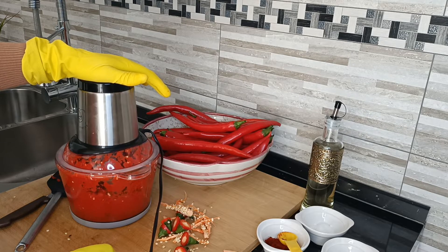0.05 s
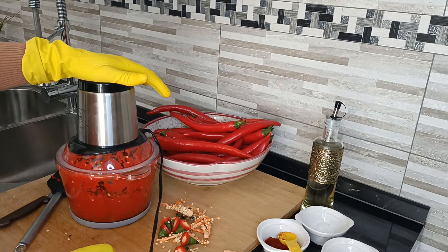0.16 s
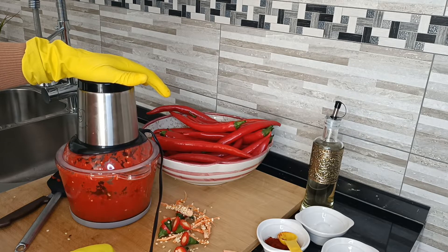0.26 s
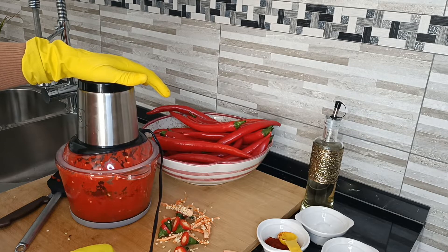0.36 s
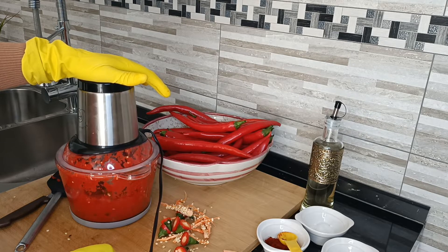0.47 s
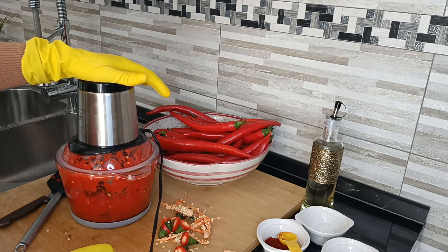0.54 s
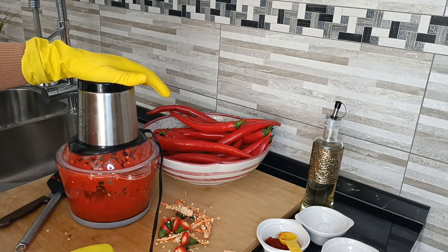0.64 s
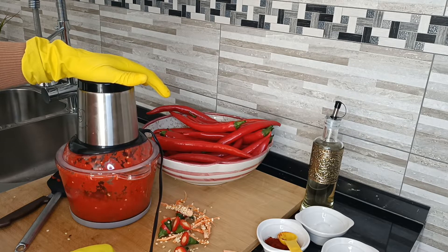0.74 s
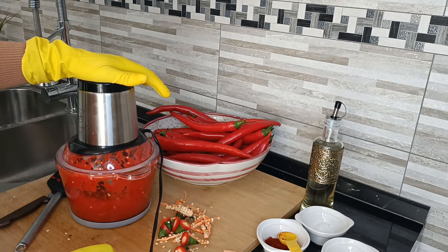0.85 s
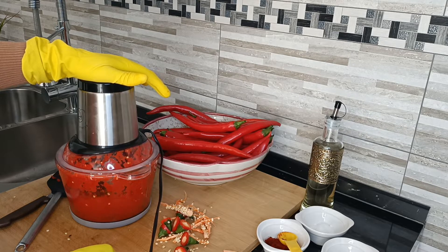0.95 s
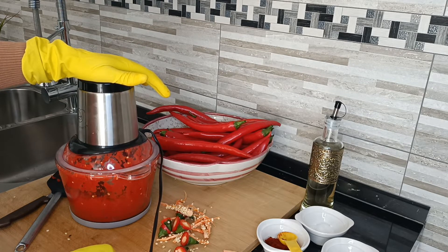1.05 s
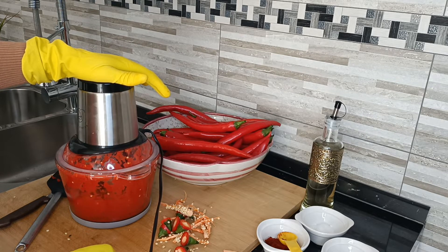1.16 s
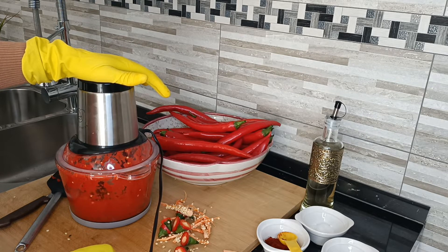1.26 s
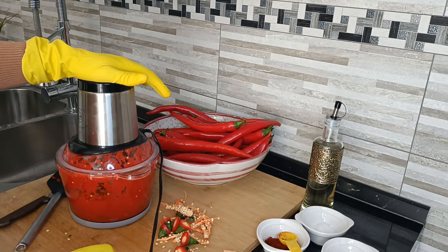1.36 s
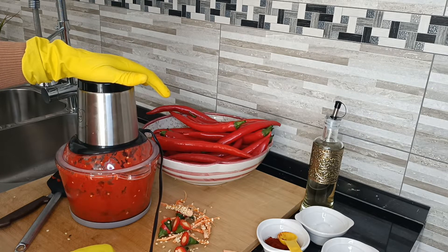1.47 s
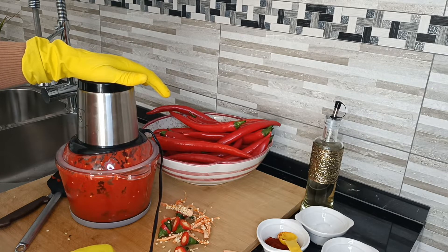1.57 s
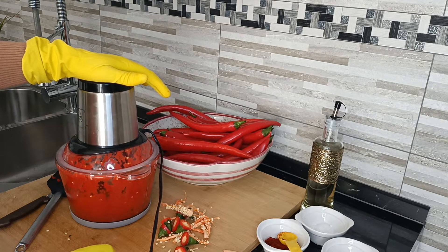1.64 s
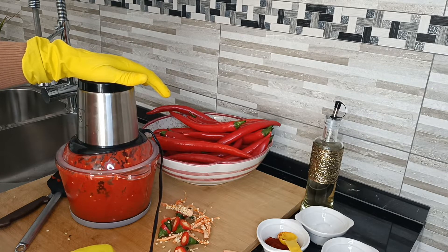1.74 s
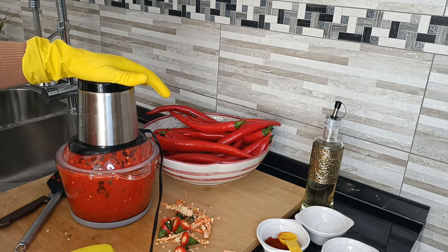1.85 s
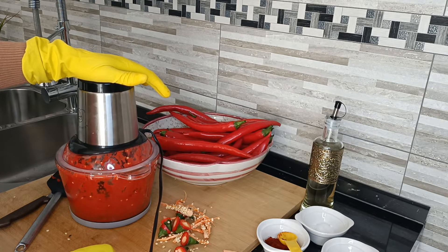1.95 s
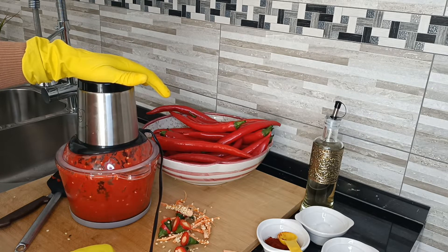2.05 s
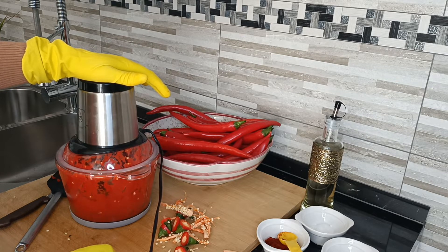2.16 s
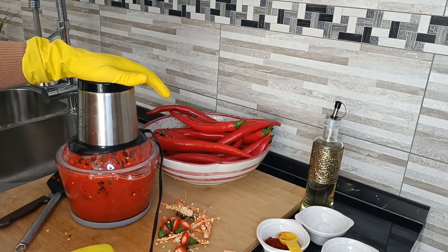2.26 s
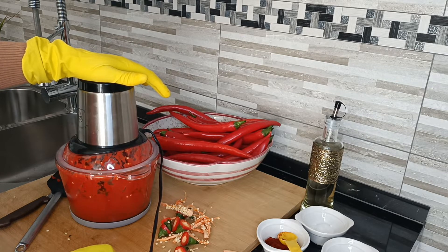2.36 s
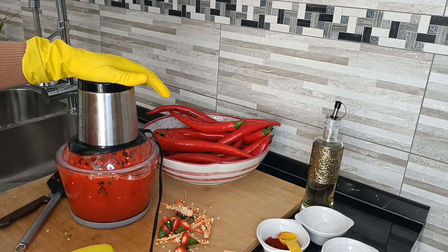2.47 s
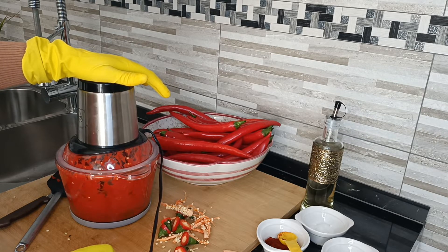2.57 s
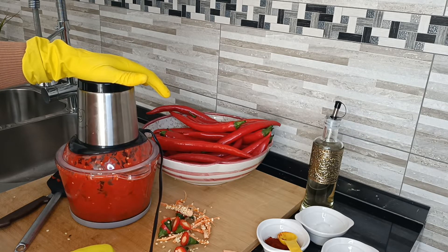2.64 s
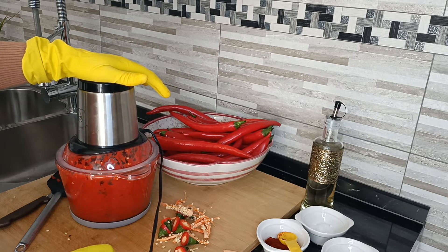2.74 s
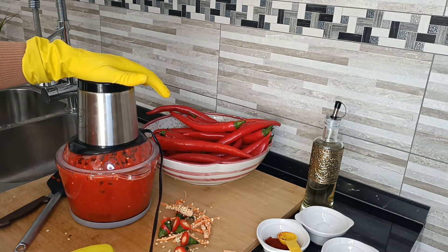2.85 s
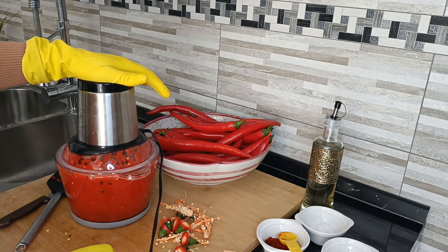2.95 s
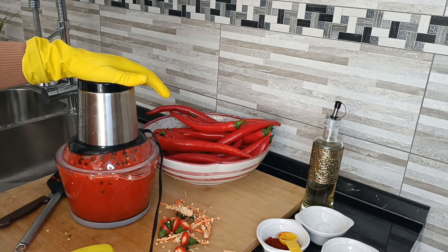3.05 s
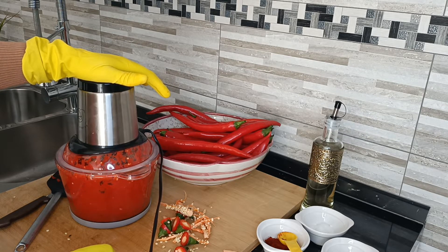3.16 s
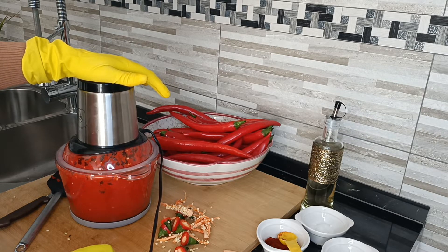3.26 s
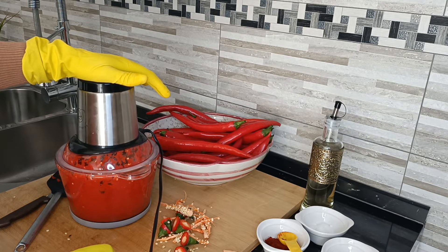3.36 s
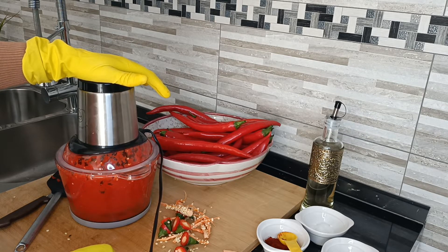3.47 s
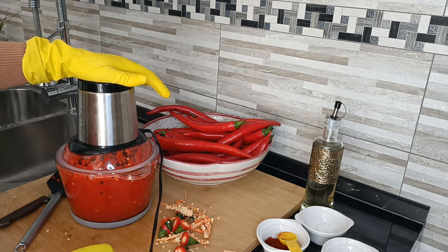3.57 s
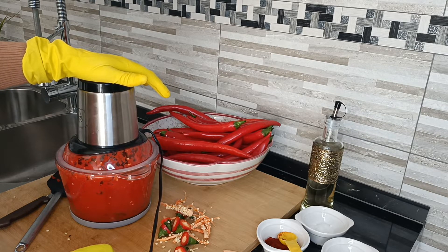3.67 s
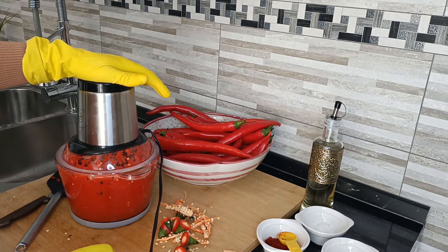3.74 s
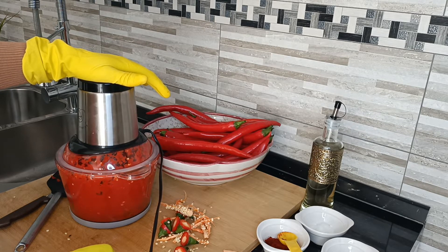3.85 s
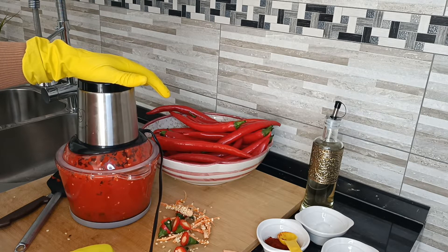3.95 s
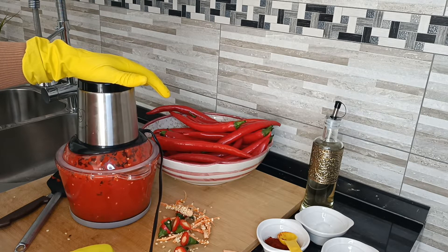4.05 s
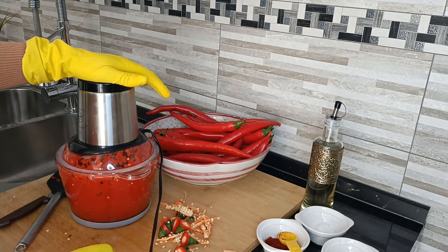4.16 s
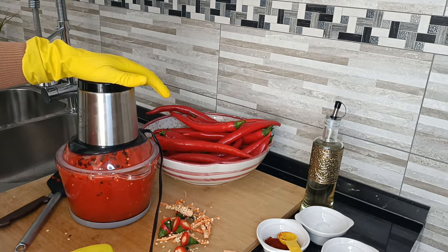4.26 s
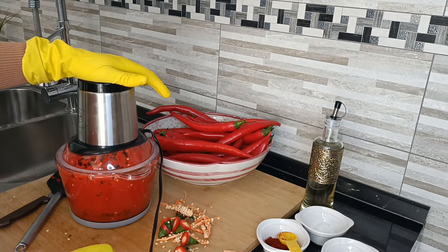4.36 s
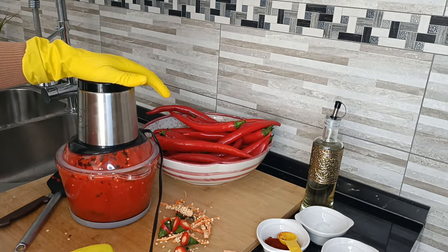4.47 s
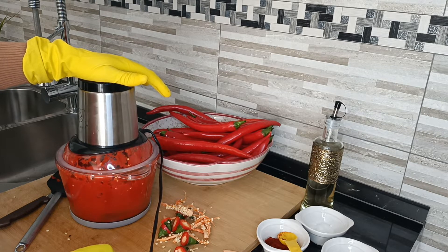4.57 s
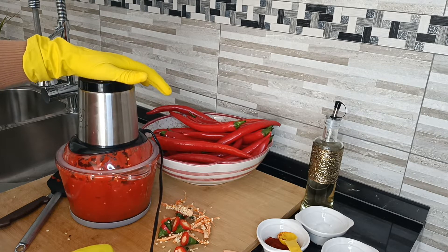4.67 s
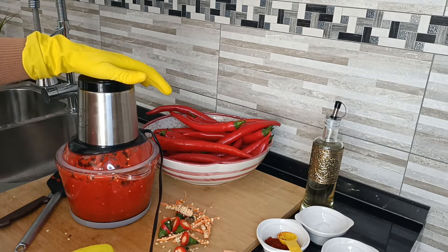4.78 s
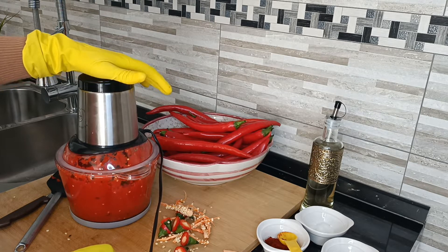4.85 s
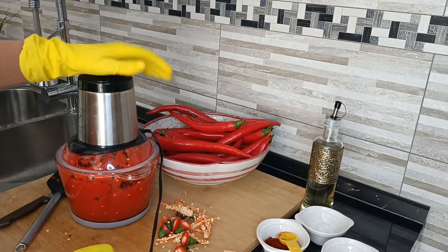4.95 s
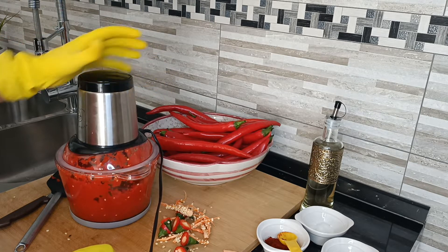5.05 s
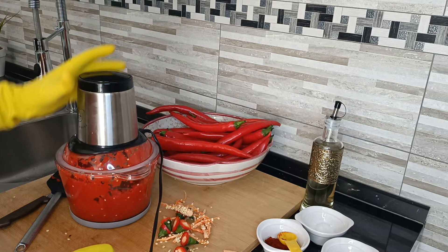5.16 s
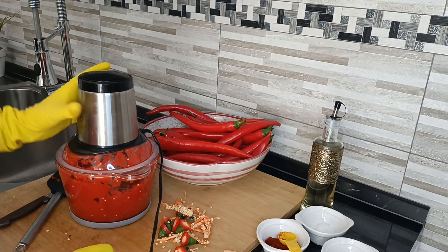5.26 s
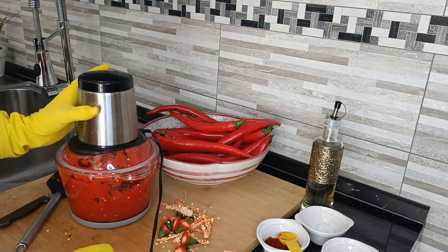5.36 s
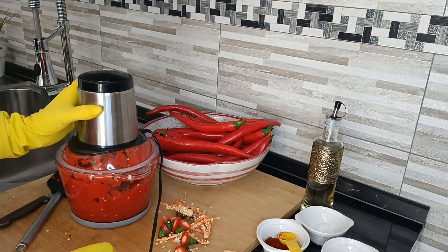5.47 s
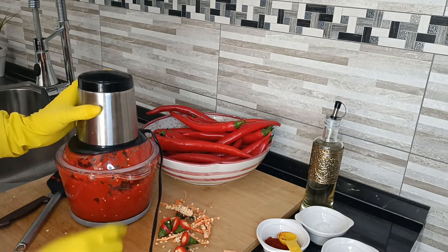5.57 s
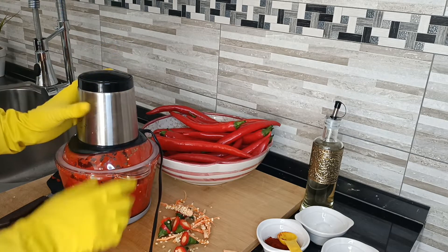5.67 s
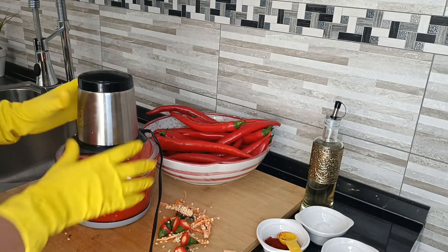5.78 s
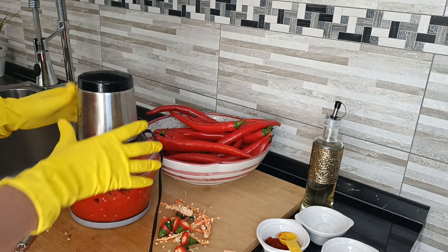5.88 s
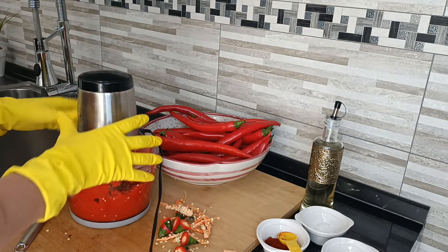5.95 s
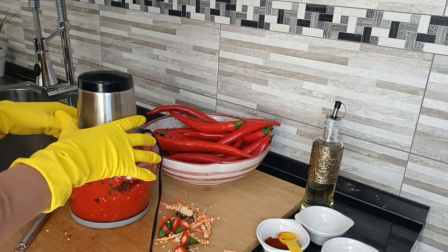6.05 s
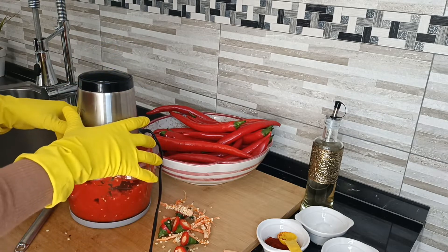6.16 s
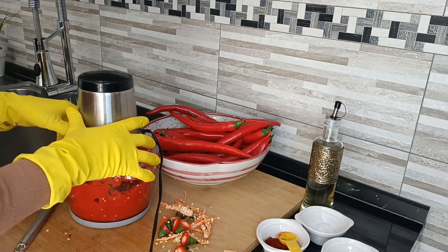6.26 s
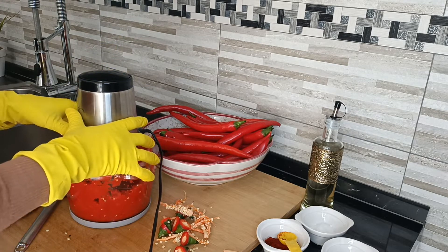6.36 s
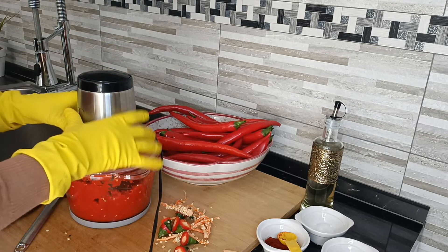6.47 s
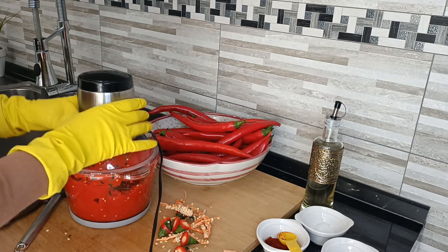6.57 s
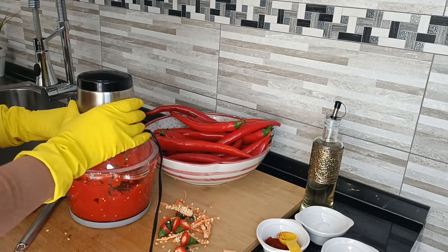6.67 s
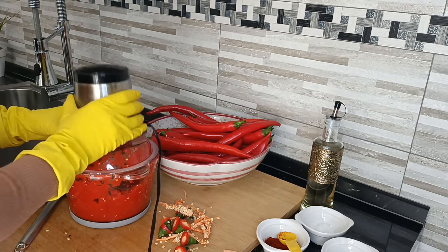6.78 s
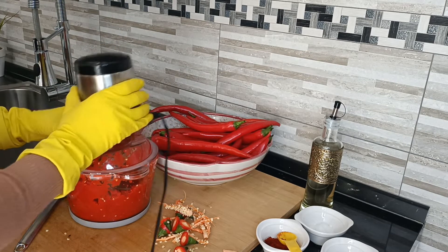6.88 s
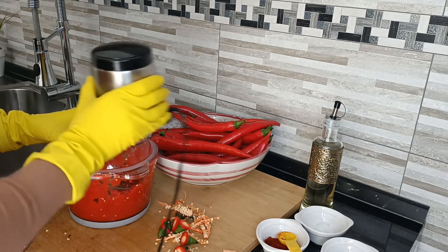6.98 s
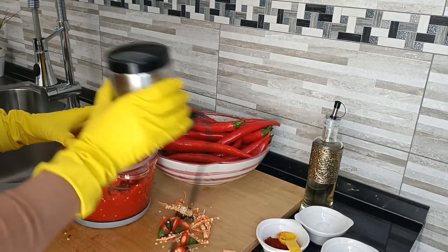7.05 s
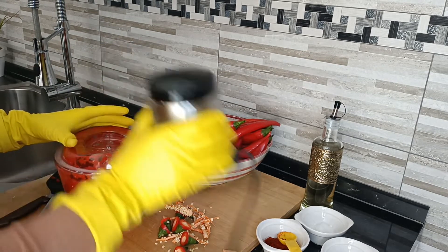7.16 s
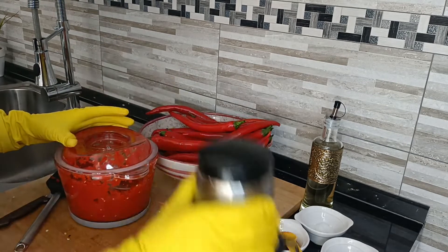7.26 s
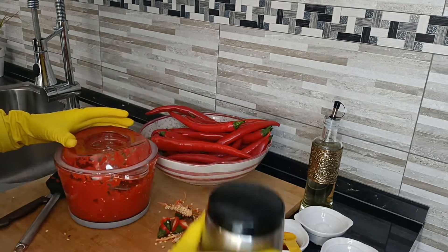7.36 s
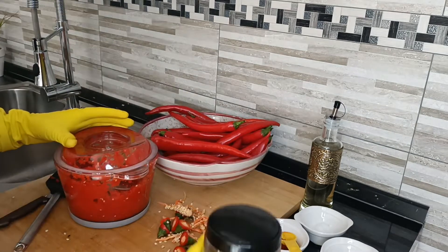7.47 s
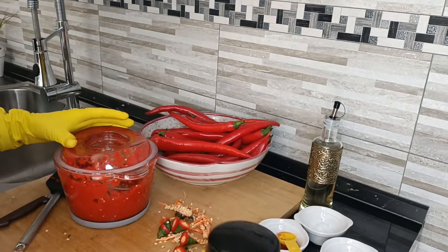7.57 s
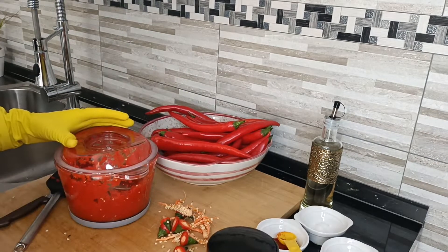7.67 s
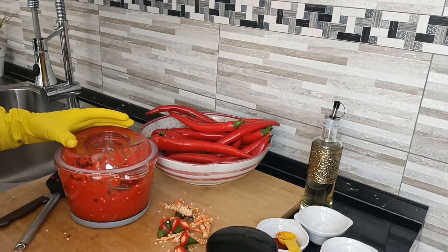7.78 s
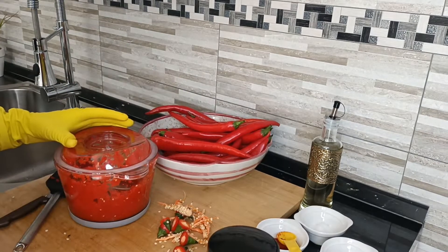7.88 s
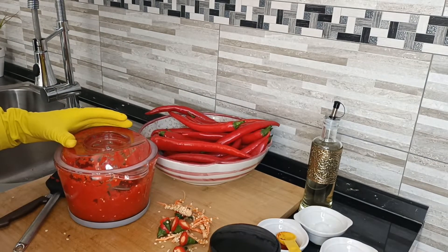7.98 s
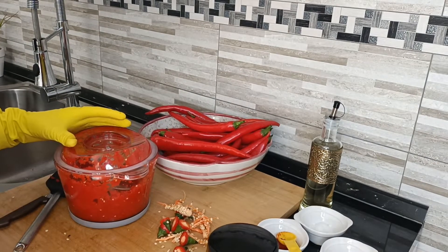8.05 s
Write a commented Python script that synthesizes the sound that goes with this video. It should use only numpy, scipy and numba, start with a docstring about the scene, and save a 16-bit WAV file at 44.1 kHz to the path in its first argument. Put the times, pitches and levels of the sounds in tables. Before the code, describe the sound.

In a tiled kitchen, an electric mini chopper runs with a rough, piercing gear whine, bright rattle and low churning of wet pulp. It switches off and slides down in pitch to a stop within half a second. Faint rubber glove rubs follow, then a plastic click as the head comes off, a heavy clunk, and a sharp double knock as it lands on the board near the stereo microphone.

```python
"""Electric mini chopper

An electric mini chopper purees chili peppers on a wooden board in a tiled kitchen.
Gear tones, rattle and pulp noise follow the speed of the blade, which coasts to a stop.
Gloved hands pull the motor head off the plastic bowl and set it down close to the microphone:
noise bursts, ringing parts, a short groan and rubbing noise. Low rumble and hiss lie beneath.
"""
import sys
import numpy as np
from scipy import signal
from scipy.fft import rfft, irfft, next_fast_len
from scipy.io import wavfile
from scipy.ndimage import uniform_filter1d
from numba import njit

SR = 44100
rng = np.random.default_rng(int(sys.argv[2]) if len(sys.argv) > 2 else 0)


def store_pcm(level_fs):
    """Save levels as 16-bit WAV."""
    pcm = np.round(np.clip(level_fs, -1, 1) * 32767).astype(np.int16)
    wavfile.write(sys.argv[1], SR, np.atleast_2d(pcm).T)


N = 358091

# All levels in the tables are relative; the functions add further gains.
# main gear mesh, sidebands three orders apart, a higher tone and the octave:
# (order [x blade speed])
MESH_ORDERS = [117, 120, 123, 126, 129, 144.4, 246]
# strength of each mesh tone: (level [dB])
MESH_DB = [-9, -27, 1.5, -3, -13, -11, -20.5]
# planets passing, slow gear stage and armature: (order [x blade speed])
HUM_ORDERS = [3, 6, 7, 21.9, 33, 48.6, 60, 63]
# strength of each hum tone: (level [dB])
HUM_DB = [-64, -64, -60.5, -60, -55, -45.5, -32, -42]
# tooth impacts as the housing radiates them: (frequency [Hz], level [dB])
HOUSING = [(250, -24.5), (700, -20.5), (1250, -18.5), (1800, -8.5), (2250, -2), (2750, 1.5), (3500, -5.5),
           (4600, -4.5), (5300, 1.5), (5700, 2), (6800, -8.5), (9000, -9), (12000, -17.5), (15500, -18)]
# pulp churning in the bowl: (frequency [Hz], level [dB])
PULP = [(25, -11), (50, -10), (75, 1), (110, 0.5), (155, 5), (200, -6.5), (450, -4), (650, -17), (900, -19),
        (2000, -25.5)]
# ringing of the bowl with its lid: (centre frequency [Hz], level [dB], time to fall 60 dB [s])
BOWL = [(165.7, -3, 0.17), (240, -8, 0.098), (340, -11, .12), (470, -2.5, 0.073), (597, -3, 0.11),
        (1763, -6.5, .11), (2010, 1, 0.056), (2604, 3.5, 0.058), (4290, -10, 0.066)]
# ringing of the motor head: (centre frequency [Hz], level [dB], time to fall 60 dB [s])
HEAD = [(149.4, -16, 0.2), (251, -15.5, 0.22), (455, -21, 0.11), (1083, -1, 0.016), (1198, 2, 0.031),
        (1438, 3, 0.048), (2150, -12, .12), (3270, -16, 0.18), (3900, -21, .1)]
# ringing of the board: (centre frequency [Hz], level [dB], time to fall 60 dB [s])
BOARD = [(70, -6.5, 0.23), (129.6, -5, 0.37), (195, -7, 0.18), (298, -3.5, 0.074), (510, -10, .12),
         (995, 0.5, 0.019), (1750, 5, 0.018), (2590, -11, 0.052)]
# blows: (time [s], level [dB], bass [dB], crack [dB], crack decay [s], ringing part [table])
KNOCKS = [ (6.718, -58.5, 18, 1, 0.024, BOWL), (6.768, -57.5, 22, 0, .014, BOWL),
          (6.825, -31.5, 0.5, -1.5, 0.0053, BOWL), (6.895, -47, -5, 1, 0.011, BOWL),
          (7.294, -39, -1, -10, 0.0067, HEAD), (7.326, -41, -5, -0.5, 0.15, HEAD),
          (7.394, -12.5, 9.5, 0, .01, HEAD), (7.412, -32, 11, 12.5, 0.0073, HEAD),
          (7.438, -31, 15, 4, 0.054, HEAD), (7.488, -22, 12.5, -13, 0.022, HEAD),
          (7.531, -27, 6, -15, 0.0093, HEAD), (7.733, -20.5, -33, 4, .004, BOARD),
          (7.74, -19.5, 2, -5, 0.0025, BOARD), (7.784, -29, 5, 6.5, 0.0034, BOARD),
          (8.084, -51, 11, 0, 0.034, BOWL)]
# contact noise of a blow: (frequency [Hz], level [dB])
CRACK = [(40, -28), (110, 16), (300, 4), (650, 3), (1300, 0), (2200, 4.5), (4000, -1), (7000, -12.5),
         (10000, -23), (15500, -30)]
# colour of sliding rubber: (frequency [Hz], level [dB])
RUBBER = [(60, 0), (200, 1), (600, -1), (1500, -3), (2700, 1), (4000, -3), (8000, -5), (15000, -7)]
# low house rumble: (frequency [Hz], level [dB])
RUMBLE = [(20, -1.5), (40, 1.5), (72, -1), (130, -8), (300, -16), (600, -22.5), (900, -20.5), (2000, -37)]
# microphone hiss: (frequency [Hz], level [dB])
HISS = [(100, -7), (600, -21), (900, -8.5), (1350, 3.5), (2100, 0.5), (3000, 4.5), (3450, 9), (3900, 5),
        (5200, 3.5), (5950, 9), (7200, -5.5), (8280, 7), (9500, -2), (15200, -0.5)]
# colour of the two microphone ports: (frequency [Hz], left level [dB], right level [dB])
PORTS = [(99.5, -0.6, -2), (1070, 4, 5), (2520, -2, -2.5), (5480, 4, 1), (6380, 7.5, -11),
         (6850, 9.5, -3.5), (7560, 0, 3), (8010, -0.5, 10.5), (8640, -8.5, 4.5), (9580, 4, 2.5),
         (10570, 5, 7.5), (12460, 2, 2.5), (13230, 11, 2), (14400, 9, -15)]
# housing resonances that the falling whine sweeps through: (frequency [Hz], level [dB])
SWEEP = [(0, -120), (500, -50), (1100, -37), (1700, -18), (2150, -11), (2600, -17), (3400, -13.5),
         (3950, -3), (4500, -4), (5200, 0)]
# the mesh sings out briefly as the load shifts: (middle [s], length [s], rise [dB])
SURGES = [(1.567, 0.11, 4.5), (1.65, 0.034, 1.5), (2.52, 0.035, 4.5), (3.122, .05, 5.5), (3.23, 0.029, 7),
          (4.291, 0.032, 10), (4.612, 0.042, 5.5), (4.73, 0.089, 5.5)]
# strokes of the rubber gloves on the housing: (middle [s], length [s], level [dB])
STROKES = [(5.77, 0.27, -62), (5.895, 0.078, -63), (6.468, .12, -66), (6.72, 0.21, -65), (7.282, .1, -64)]
# bright ticks where hard edges meet: (time [s], level [dB], decay [s])
TICKS = [(6.775, -45.5, 0.015), (7.328, -44.5, 0.061), (7.394, -22.5, 0.029), (7.674, -38, 0.0051),
         (7.784, -47, .003), (8.01, -50, .006)]
# colour of a tick: (frequency [Hz], level [dB])
TICK_COLOUR = [(800, -25), (2300, 7.5), (4400, 4), (7000, 1.5), (9000, -3.5), (11500, -9.5), (15500, -13)]

TIME = np.arange(N) / SR  # seconds
FREQ = np.maximum(np.fft.rfftfreq(N, 1 / SR), 1)  # Hz
# typical blade speed in turns per second: in coarse pulp, and in thin pulp
RUNNING_HZ, THIN_HZ = 42.95, 44.15
THINS_FROM_S, THINS_UNTIL_S = 3.7, 4.35
LOAD_WANDER = 0.00304  # share of the speed
# moment of switching off, time taken to stop, and time constant of the drag
OFF_S, COAST_S, DRAG_S = 4.726, .5, .5
# whine level, then its change in thin pulp and while coasting
SING_DB, SING_THIN_DB, SING_COAST_DB = -30.5, -1.5, 5.5
HUM_FADE = 2.1  # the hum dies away as this power of the speed
# rattle level before the chopper's overall gain; share of running speed near which it fades
RATTLE_DB, RATTLE_FADE = -22, 0.58
KNOCK_PAN_DB = 0.9  # left minus right
CLATTER_DB, CLATTER_HZ = 2, 130  # raggedness of the contact noise: depth and rate
# groan of the rubber foot: middle, length and level; then base pitch at the middle and its fall
FOOT_S, FOOT_LENGTH_S, FOOT_DB = 7.645, .04, -51
FOOT_HZ, FOOT_SAG_HZ_PER_S = 477, 1800
RUMBLE_DB, HISS_DB = -61.5, -57.0
TOP_HZ = 15650  # upper edge of the sound


def chopper():
    """Gear tones, tooth rattle and churning pulp, all driven by the blade shaft."""
    speed = blade_speed()
    pace = speed / RUNNING_HZ
    # without drive the teeth float in the play between them and the tones turn rough
    floating = np.clip((1 - pace) / .15, 0, 1) * (TIME > OFF_S)
    # lumps of pepper make the turning uneven
    turns = np.cumsum(speed * (1 + 0.00136 * walk(16.0))) / SR
    # teeth chatter unevenly, hardest each time one of the three planets passes
    planets = 0.3 * np.cos(2 * np.pi * 3 * turns)
    chatter = undb(planets + 0.7 * walk(338) + 0.4 * walk(31.0))
    layers = (gear_whine(turns, speed, floating) + motor_hum(turns, pace, floating)
              + tooth_rattle(chatter, pace) + churning_pulp(turns, pace))
    return undb(4.5) * layers


def gear_whine(turns, speed, floating):
    """Meshing teeth sing at multiples of the blade speed, louder near a housing resonance."""
    slip = 0.95 * (1 + 2.8 * floating)
    whine = sum(undb(db) * tone(turns, order, slip=slip, flutter_db=3.5)
                for order, db in zip(MESH_ORDERS, MESH_DB))
    surge_db = sum(rise_db * swell(s, length) for s, length, rise_db in SURGES)
    sing_db = SING_DB + SING_THIN_DB * thinness() + SING_COAST_DB * floating + surge_db
    main_mesh_hz = speed * MESH_ORDERS[2]
    return whine * undb(sing_db + np.interp(main_mesh_hz, *np.transpose(SWEEP)))


def motor_hum(turns, pace, floating):
    """Planets, slow gear stage and armature hum at their own multiples of the blade speed."""
    slip = 0.2 + 2.66 * floating
    lines = [undb(db) * tone(turns, order, slip=slip, flutter_db=3.5)
             for order, db in zip(HUM_ORDERS, HUM_DB)]
    # the armature line comes forward once the thin pulp lets the motor race
    armature = 0.98 * thinness() * (1 - floating) * lines[5]
    return (sum(lines) + armature) * pace ** HUM_FADE


def tooth_rattle(chatter, pace):
    """Uneven tooth impacts shake the housing; slower teeth strike softly and lose treble."""
    hard = unit(colour(noise_pair() * chatter, HOUSING))
    soft = colour(hard, [(900, -3), (1800, 4), (2600, -7.5), (3800, 0),
                         (5300, -18), (7000, -13), (14000, -65)])  # (Hz, dB)
    force = np.minimum(pace, 1) ** 1.2
    rattle = force * hard + (1 - force) * soft
    return rattle * undb(RATTLE_DB) * np.tanh(pace / RATTLE_FADE)


def churning_pulp(turns, pace):
    """Wet pulp makes mostly low noise that swells once per turn of the blade."""
    churn = undb(1.8 * walk(29) + 1.3 * np.sin(2 * np.pi * turns))
    pulp = unit(colour(noise_pair() * churn, PULP))
    return undb(-46.5) * pulp * pace ** 0.68


def blade_speed():
    """Turns per second: faster as the pulp thins, then braked to rest by drag and dry friction."""
    steady = RUNNING_HZ + (THIN_HZ - RUNNING_HZ) * thinness()
    driven = steady * (1 + LOAD_WANDER * walk(2.485))
    friction = np.exp(-COAST_S / DRAG_S)
    coast = (np.exp(-np.maximum(TIME - OFF_S, 0) / DRAG_S) - friction) / (1 - friction)
    return driven * np.maximum(coast, 0)


def thinness():
    """How runny the pulp is: 0 while coarse, 1 once it is a thin puree."""
    return np.clip((TIME - THINS_FROM_S) / (THINS_UNTIL_S - THINS_FROM_S), 0, 1)


def tone(turns, order, slip, flutter_db):
    """One rough tone, shaken in phase and strength, partly differently at each port."""
    phase = 2 * np.pi * order * turns + slip * walk(54.6)
    shared_db = flutter_db * walk(30)
    ports = []
    for _ in range(2):
        strength = undb(shared_db + 1.8 * walk(12))
        ports.append(unit(strength * np.sin(phase + .4 * walk(9))))
    return np.array(ports)


def knocks():
    """Each blow gives a short crack of contact noise and rings the part that was struck."""
    out = np.zeros((2, N))
    # loose parts make the contact noise ragged
    contact = unit(colour(noise_pair() * undb(CLATTER_DB * walk(CLATTER_HZ)), CRACK))
    pan_db = np.array([[1], [-1]]) * KNOCK_PAN_DB / 2
    for s, db, bass_db, crack_db, decay, modes in KNOCKS:
        start = int(s * SR)
        t = TIME[:min(SR // 2, N - start)]
        stop = start + len(t)
        crack = undb(crack_db) * contact[:, start:stop] * np.exp(-t / decay)
        attack = 1 - np.exp(-t / 0.0018)
        blow = (ringing(modes, t, bass_db) + crack) * attack
        out[:, start:stop] += blow * undb(db + pan_db)
    # keep the thump, trim the bass below about 60 Hz
    return signal.sosfilt(signal.butter(2, 60, "high", fs=SR, output="sos"), out)


def ringing(modes, t, bass_db):
    """Loose joints split the upper tones into close clusters, out of step at the two ports."""
    ring = 0
    for hz, mode_db, t60 in modes:
        bass = 1 / (1 + (hz / 450) ** 4)  # near 1 for low tones, near 0 for high ones
        envelope = undb(mode_db + bass * (bass_db - 5.0) - 60 * t / t60)
        for split in (-.04, 0, .04):
            detuned_hz = hz * (1 + (1 - bass) * (split + .015 * rng.standard_normal()))
            skew = min(hz / 1800, 1.5) * rng.standard_normal() * np.array([[.7], [-.7]])
            ring = ring + envelope * np.sin(2 * np.pi * detuned_hz * t + skew)
    return ring * undb(-6.5)


def ticks():
    """Hard plastic and steel edges snap together: a burst of treble with no ring."""
    burst = sum(undb(db) * (TIME >= s) * np.exp(-np.abs(TIME - s) / decay)
                for s, db, decay in TICKS)
    return burst * unit(colour(noise_pair(), TICK_COLOUR))


def foot():
    """The rubber foot sticks and slips as the head settles: a short, falling groan."""
    cycles = np.cumsum(FOOT_HZ - FOOT_SAG_HZ_PER_S * (TIME - FOOT_S)) / SR
    partials = [(.63, 3), (1, 6), (2.35, 0.5)]  # (multiple of base pitch, dB)
    groan = sum(undb(part_db) * tone(cycles, multiple, slip=1.1, flutter_db=2.5)
                for multiple, part_db in partials)
    return groan * undb(FOOT_DB) * swell(FOOT_S, FOOT_LENGTH_S)


def gloves():
    """Rubber catches and slips in small uneven steps; a firm stroke also scuffs the steel."""
    stroke = sum(undb(db) * swell(s, length) for s, length, db in STROKES)
    slips = noise_pair() * undb(1.7 * walk(90))
    rubber = unit(colour(slips, RUBBER))
    scuff = unit(colour(slips, [(1200, -44), (2200, -7), (2700, -1.5), (3400, -11), (6000, -22)]))
    firmness = (stroke / stroke.max()) ** 2
    return stroke * (rubber + undb(6.5) * scuff * firmness)


def background():
    """Low house rumble under a smooth hiss, both made of filtered noise."""
    rumble = unit(colour(noise_pair(), RUMBLE))
    hiss = unit(colour(noise_pair(), HISS))
    return undb(RUMBLE_DB) * rumble + undb(HISS_DB) * hiss


def kitchen(x, wet_db, low_t60, high_t60):
    """Dense reflections off the tiles; the treble dies first."""
    noise = noise_pair()
    low = colour(noise, [(900, -4.5), (2500, -7.5), (7000, -63)])
    high = noise - low
    t = TIME[:SR]
    tail = low[:, :SR] * undb(-60 * t / low_t60) + high[:, :SR] * undb(-60 * t / high_t60)
    tail = tail * np.clip(t / 0.0024 - 1, 0, 1)  # silent for 2.4 ms, then fades in
    tail = tail / np.sqrt(np.sum(tail ** 2) / 2)
    return x + undb(wet_db) * signal.fftconvolve(x, tail, axes=1)[:, :N]


def undb(db):
    """Turn decibels into a gain."""
    return 10 ** (np.asarray(db) / 20)


def unit(x):
    """Scale to an average (rms) strength of 1."""
    return x / np.sqrt(np.mean(x ** 2))


def colour(x, points):
    """Filter by an outline of (frequency [Hz], level [dB]) points."""
    hz, db = np.transpose(points)
    size = next_fast_len(N + SR // 2, True)
    freq = np.maximum(np.fft.rfftfreq(size, 1 / SR), 1)
    gain = undb(np.interp(np.log(freq), np.log(hz), db))
    return irfft(rfft(x, size) * gain, size)[..., :N]


def walk(rate):
    """Smooth random wander of spread 1, about rate changes a second."""
    return unit(irfft(rfft(rng.standard_normal(N)) / (1 + (FREQ / rate) ** 4), N))


def noise_pair(split_hz=650):
    """Noise at two close ports: alike in the bass, unrelated in the treble."""
    mid, side = rng.standard_normal((2, N))
    side = irfft(rfft(side) * FREQ / np.hypot(FREQ, split_hz), N)
    return np.array([mid + side, mid - side]) / np.sqrt(2)


def swell(s, length):
    """Smooth rise and fall about time s, above half height for the given length."""
    return 2 ** -((2 * (TIME - s) / length) ** 2)


@njit
def follow(size, attack, release):
    """Level detector that rises fast and falls slowly."""
    out = np.empty(len(size))
    level = size[:2000].mean()
    for i in range(len(size)):
        level += (size[i] - level) * (attack if size[i] > level else release)
        out[i] = level
    return out


def gain_control(x, threshold_db=-33, ratio=1.41, attack_s=0.14, release_s=0.67):
    """Loud sound turns the gain down; the hiss creeps back afterwards."""
    power = uniform_filter1d(np.mean(x ** 2, axis=0), size=1024)
    size = np.sqrt(np.abs(power))
    level = follow(size, 1 / (attack_s * SR), 1 / (release_s * SR))
    excess = np.maximum(level / undb(threshold_db), 1)
    return x * excess ** (1 / ratio - 1)


def scene():
    """Machine and handling echo in the kitchen; gloves and background are added without echo."""
    machine = kitchen(chopper(), wet_db=-4.0, low_t60=0.74, high_t60=0.22)
    handling = kitchen(knocks() + ticks() + foot(), wet_db=-3.5, low_t60=0.52, high_t60=0.22)
    return machine + handling + gloves() + background()


def record(dry):
    """Each microphone port colours the sound; then the gain rides and the top is cut."""
    ports = np.array(PORTS)
    left = colour(dry[0], ports[:, [0, 1]])
    right = colour(dry[1], ports[:, [0, 2]])
    top_cut = signal.ellip(10, .2, 80, TOP_HZ, fs=SR, output="sos")
    return signal.sosfilt(top_cut, gain_control(np.array([left, right])))


dry = scene()
out = record(dry)
store_pcm(out)
```